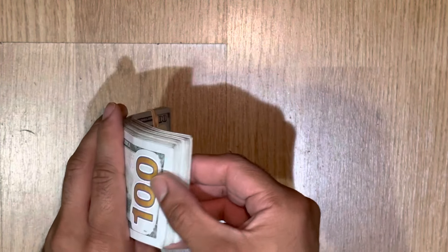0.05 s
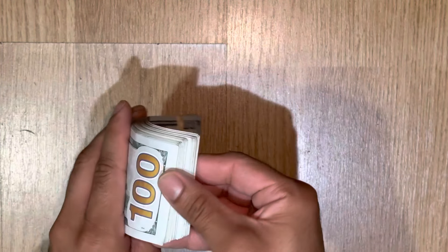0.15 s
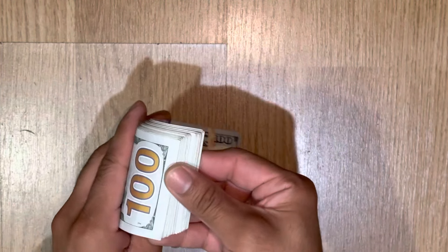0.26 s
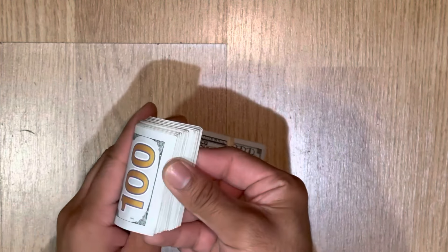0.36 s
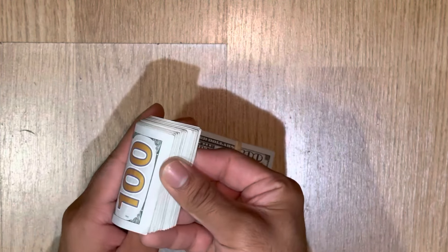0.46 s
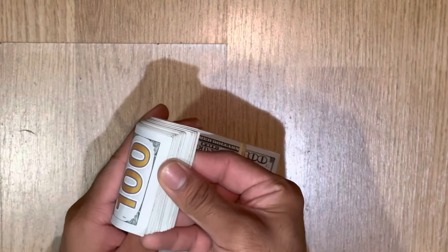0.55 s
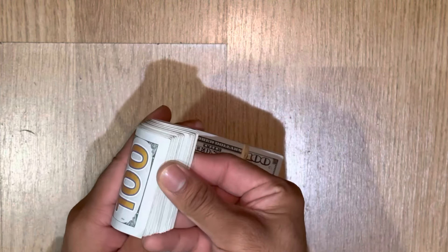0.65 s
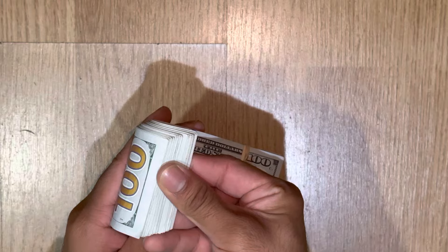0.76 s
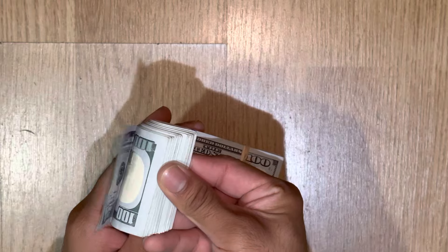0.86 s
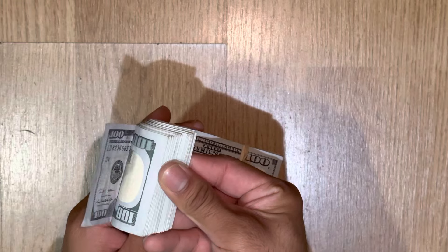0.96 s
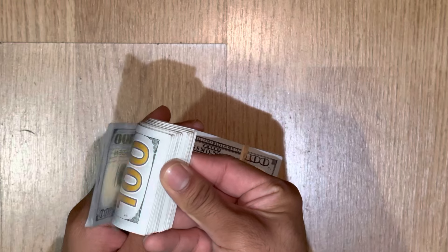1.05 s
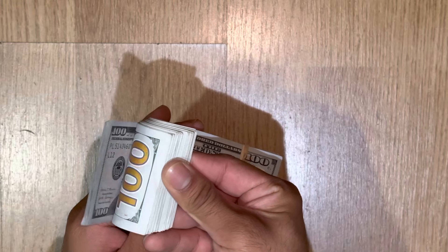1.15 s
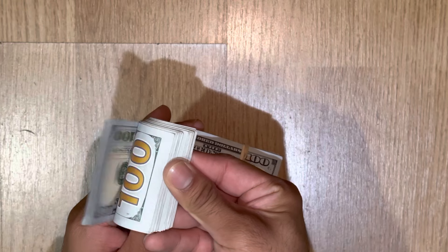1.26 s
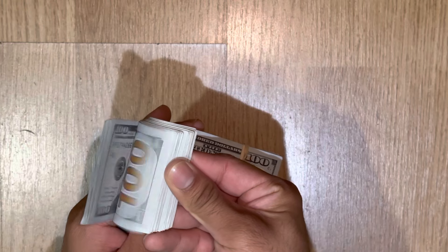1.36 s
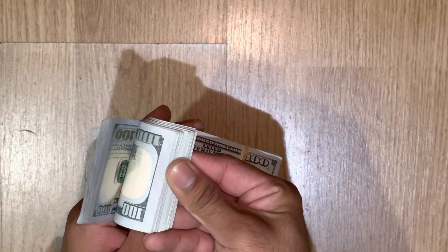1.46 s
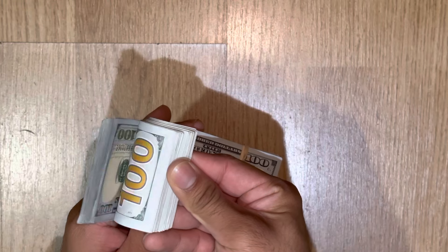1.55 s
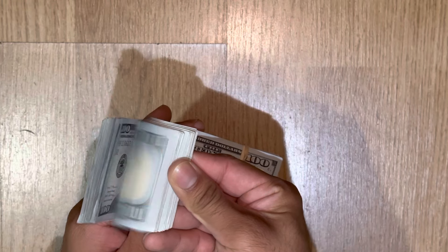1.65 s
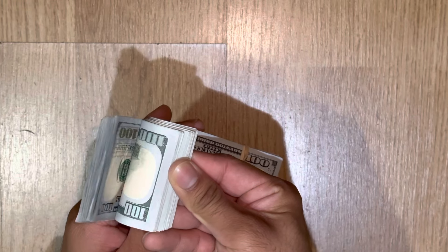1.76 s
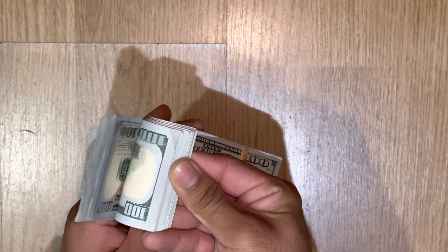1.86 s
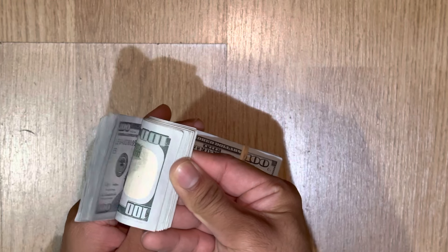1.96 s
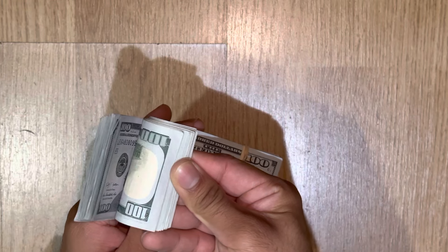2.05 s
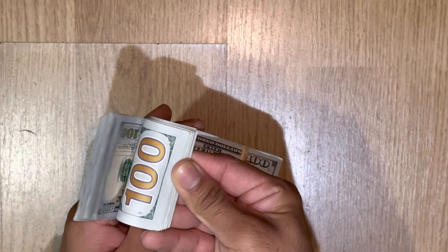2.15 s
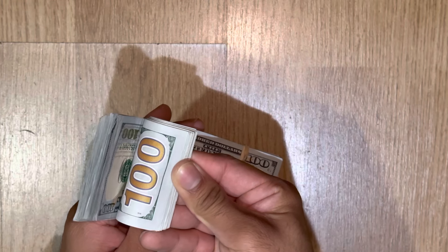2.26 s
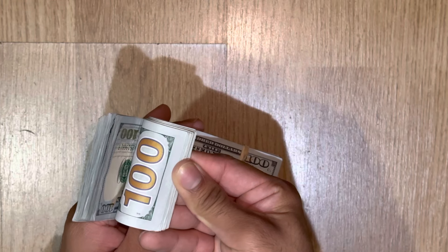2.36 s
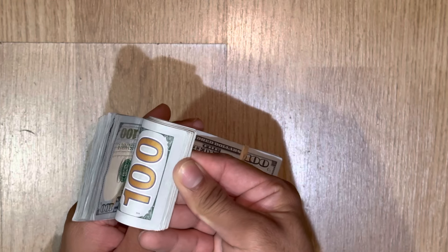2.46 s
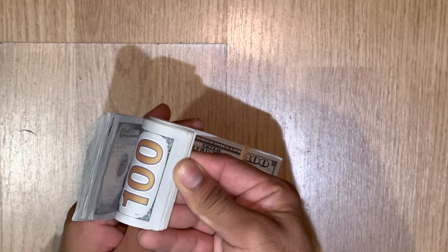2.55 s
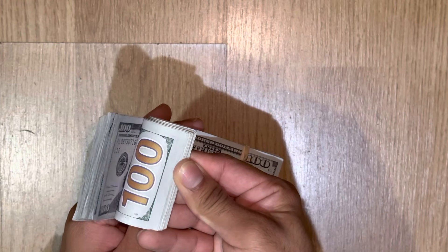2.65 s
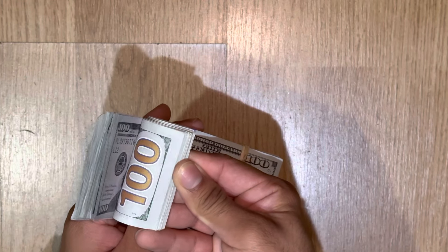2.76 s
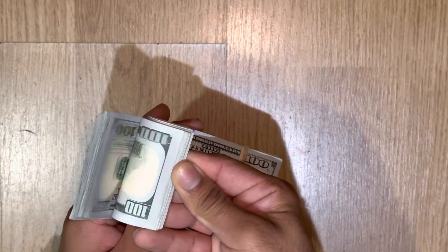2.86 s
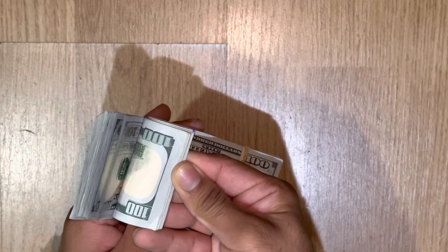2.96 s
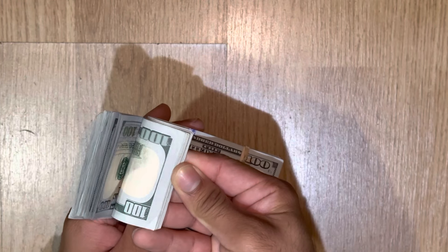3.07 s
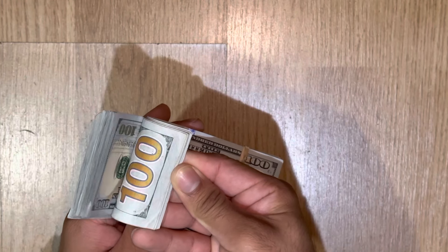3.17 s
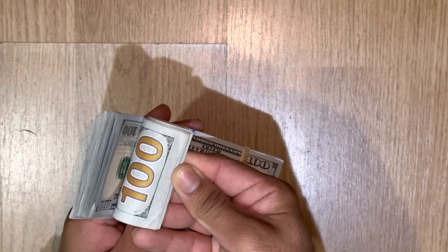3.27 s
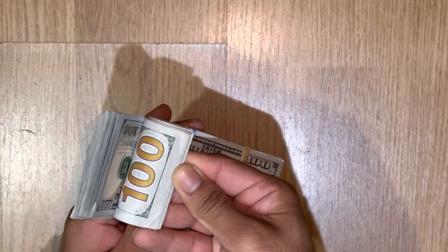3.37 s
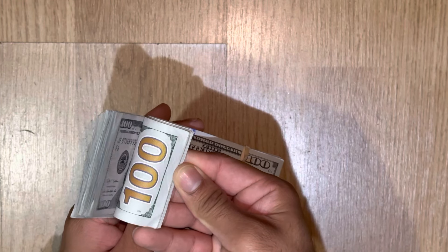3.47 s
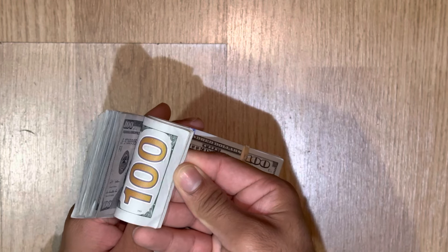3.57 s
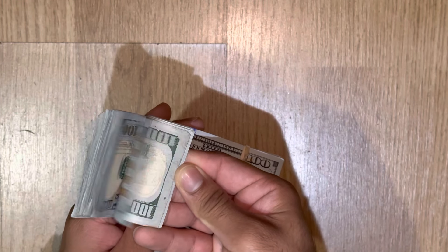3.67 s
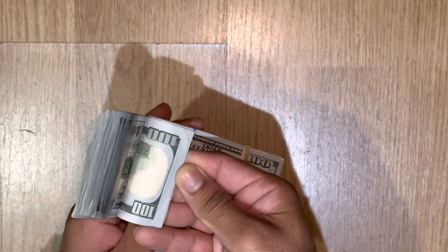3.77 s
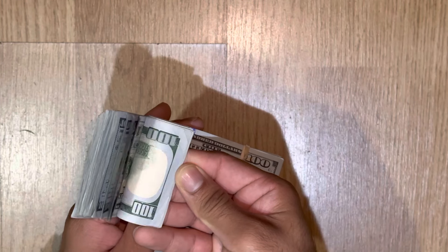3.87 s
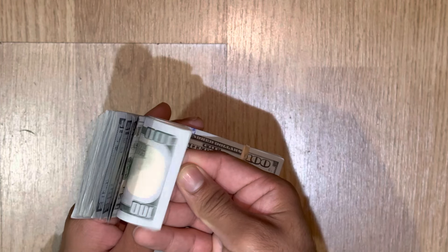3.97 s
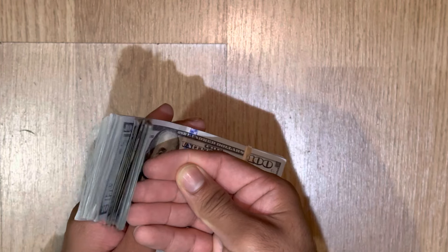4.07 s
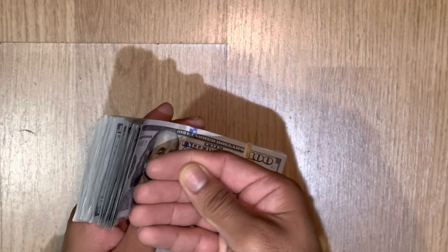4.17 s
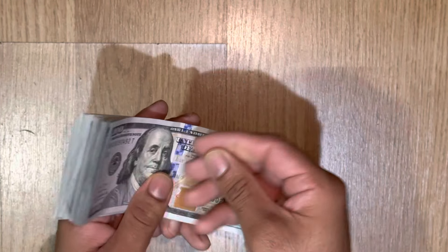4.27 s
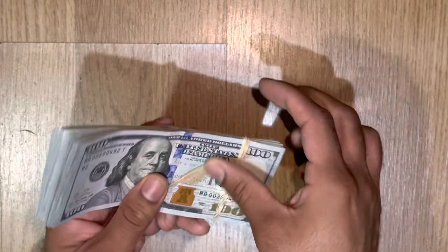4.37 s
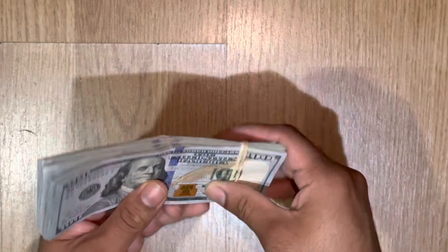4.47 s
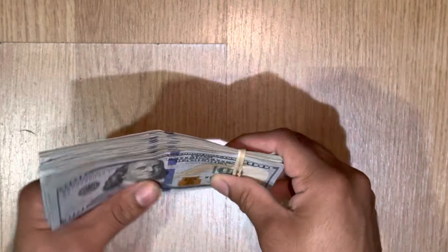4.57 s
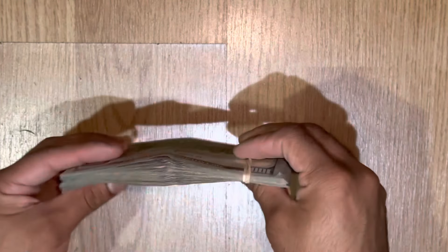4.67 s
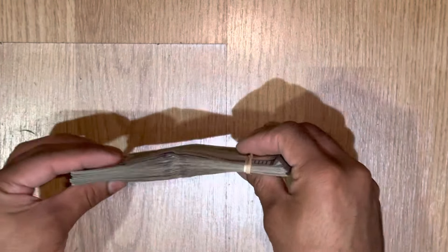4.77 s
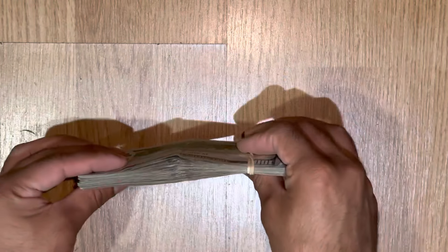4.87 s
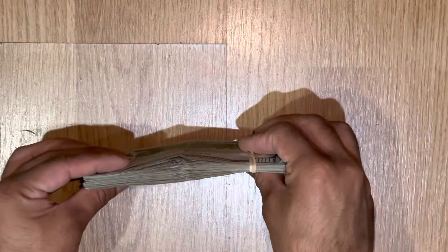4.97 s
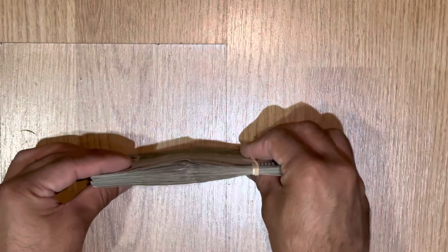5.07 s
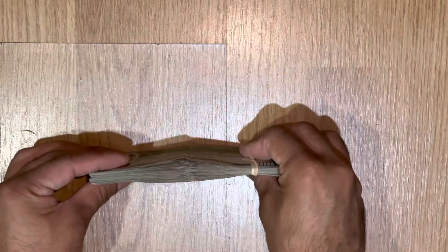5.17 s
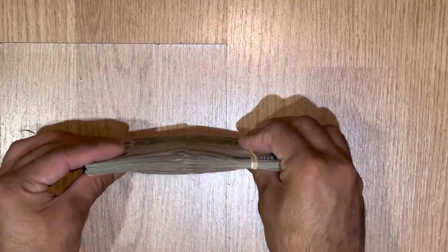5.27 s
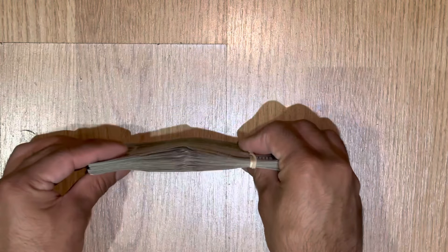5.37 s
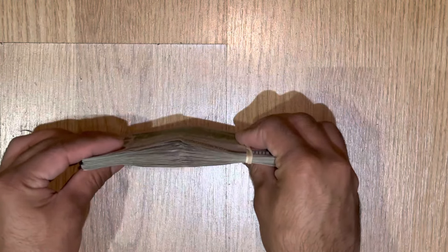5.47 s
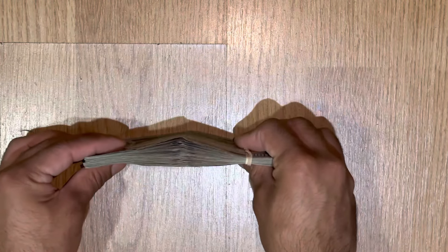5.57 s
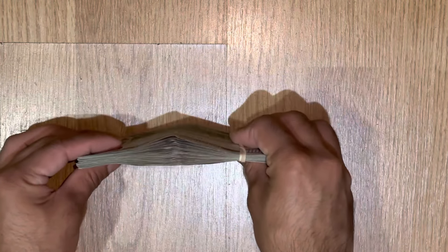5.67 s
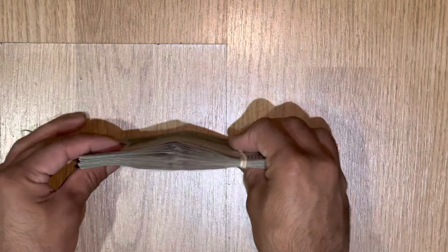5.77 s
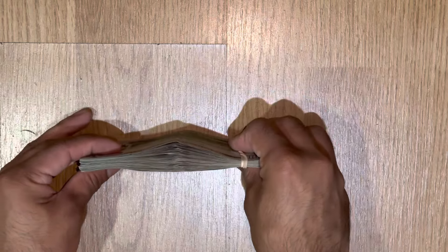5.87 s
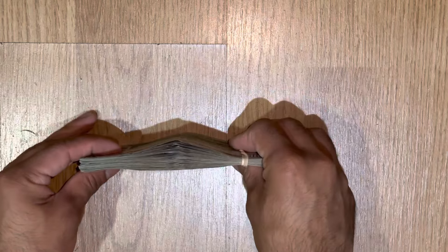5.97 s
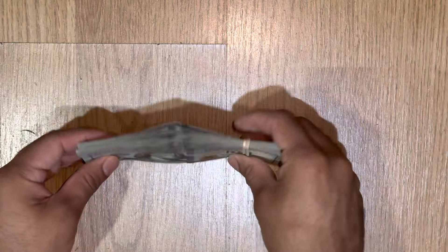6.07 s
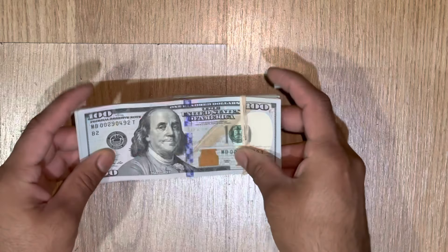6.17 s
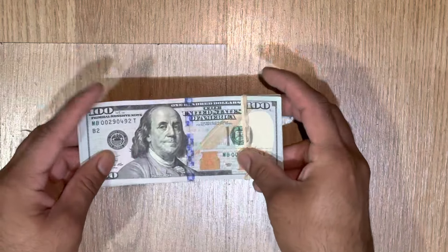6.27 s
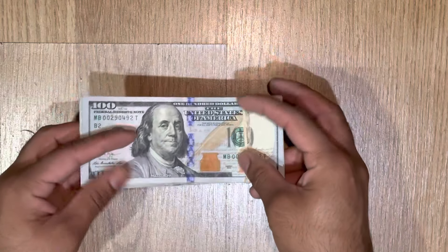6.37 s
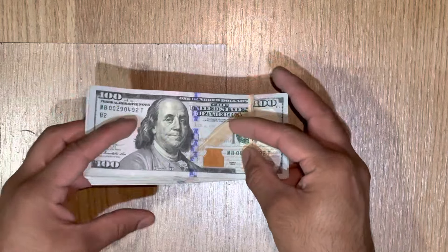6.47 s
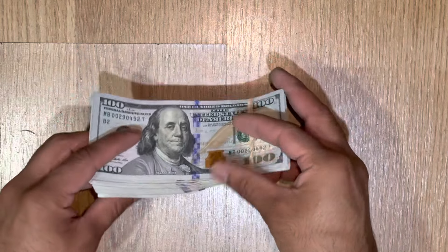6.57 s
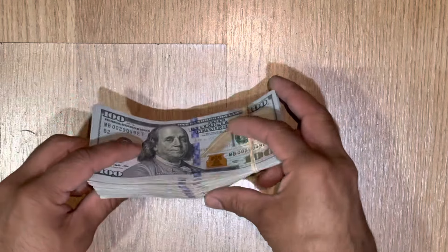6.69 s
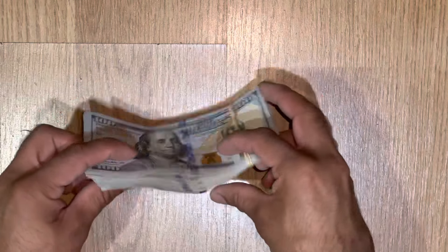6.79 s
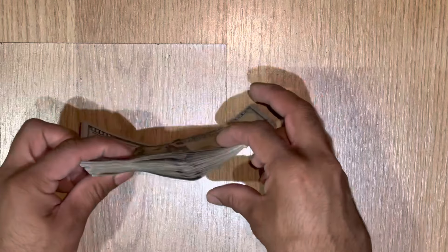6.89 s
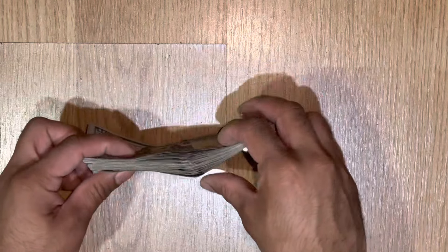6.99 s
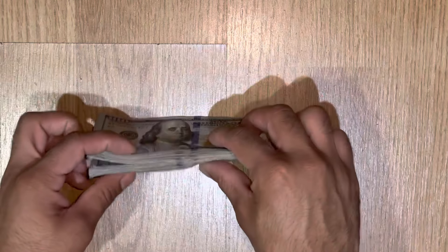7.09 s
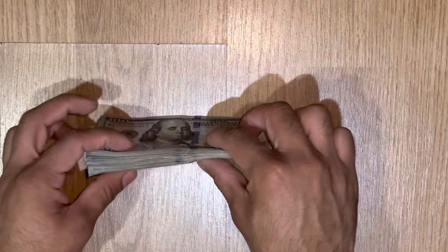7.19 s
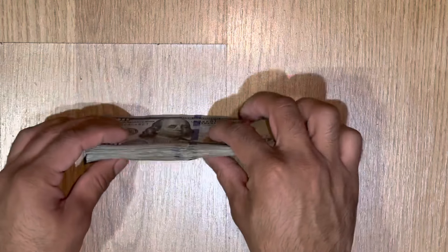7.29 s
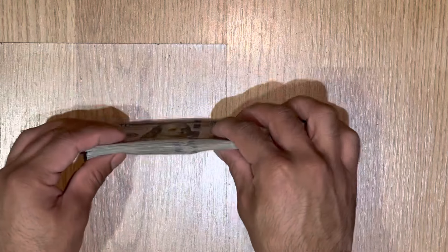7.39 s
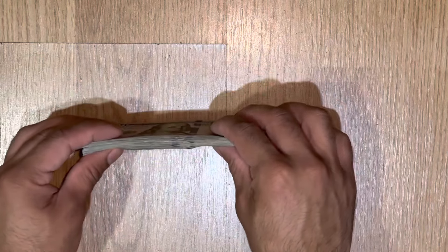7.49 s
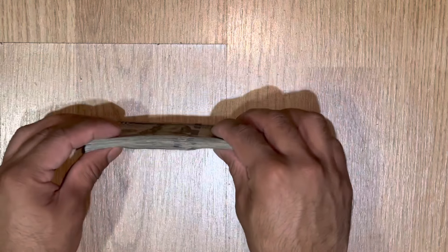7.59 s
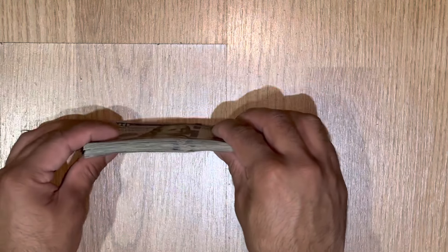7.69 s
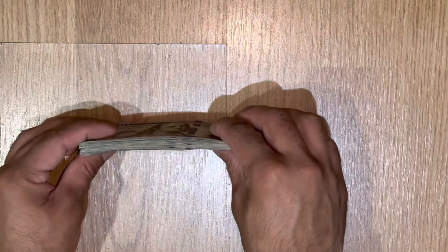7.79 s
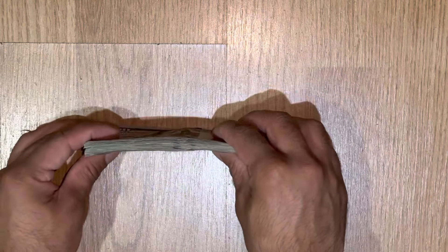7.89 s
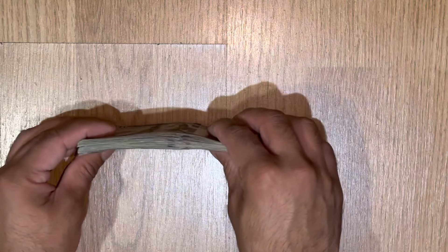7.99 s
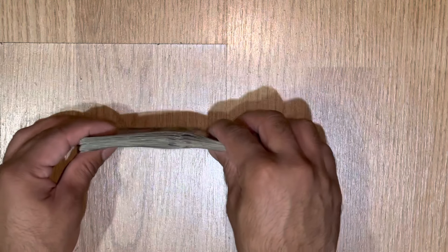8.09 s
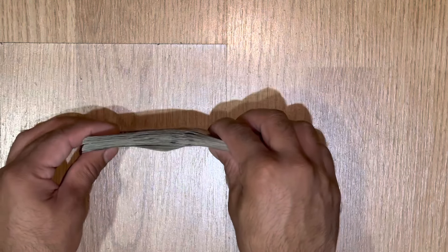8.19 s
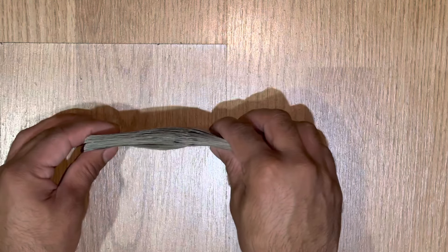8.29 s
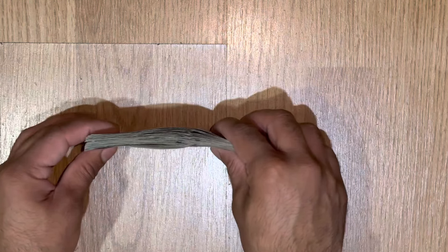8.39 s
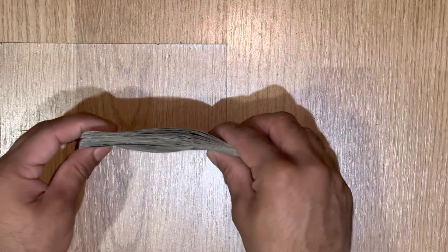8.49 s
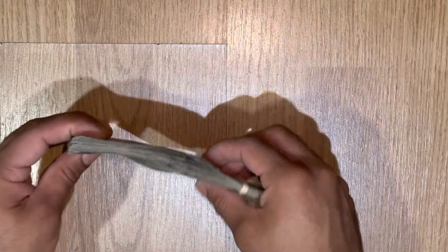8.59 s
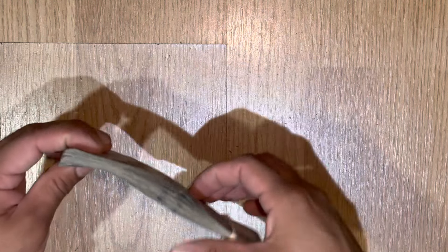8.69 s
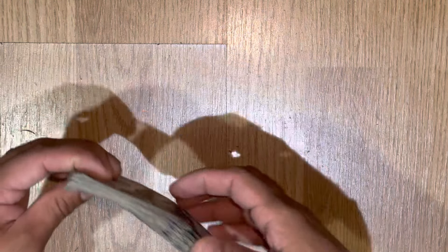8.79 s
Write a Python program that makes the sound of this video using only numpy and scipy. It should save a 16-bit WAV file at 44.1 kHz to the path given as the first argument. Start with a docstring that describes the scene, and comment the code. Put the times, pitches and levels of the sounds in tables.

```python
"""A note scrapes and snaps first: a banded stack of crisp banknotes is thumbed just under a phone.
The place is a small quiet room; each freed note is a burst of fibre noise with a short ring, then a pat.
Grainy noise slides the notes together; the stack's edge knocks a wooden surface four times, then three,
as noise bursts over decaying wood modes. Behind lie soft air, low rumble and a distant appliance's hum.
Two spaced microphone ports hear it, with the blows a little to the right."""
import sys
import numpy as np
from scipy import signal
from scipy.fft import rfft, irfft
from scipy.io import wavfile
from scipy.ndimage import uniform_filter1d

SR = 44100
rng = np.random.default_rng(int(sys.argv[2]) if len(sys.argv) > 2 else 0)


def waveform_to_disk(signal):
    """Save audio, clipped to [-1, 1], as 16-bit WAV at the path in sys.argv[1]."""
    frames = np.transpose(np.atleast_2d(signal))
    scaled = np.clip(frames, -1, 1) * 32767
    samples = np.round(scaled).astype(np.int16)
    wavfile.write(sys.argv[1], SR, samples)


N = 389844
MS = SR / 1000  # samples per millisecond
TIME = np.arange(N) / SR
HZ = np.arange(N // 2 + 1) * SR / N  # frequencies of the full-length spectrum


def undb(db):
    """Decibels to gain."""
    return 10 ** (np.asarray(db) / 20)


def unit(x):
    """Scale to rms 1."""
    return x / np.sqrt(np.mean(x ** 2))


def packet(x, db, ms):
    """Give a short sound the energy of a level held for so many ms."""
    return x * undb(db) * np.sqrt(ms * MS / np.sum(x ** 2))


def band(x, lo_hz, hi_hz, order=2):
    """Causal band-pass."""
    edges = [lo_hz, min(hi_hz, SR / 2 - 1000)]
    return signal.sosfilt(signal.butter(order, edges, "band", fs=SR, output="sos"), x)


def resonate(x, hz, q):
    """One resonance, gain 1 at its centre."""
    return signal.lfilter(*signal.iirpeak(min(hz, SR / 2 - 1000), max(q, 1), SR), x)


def along(table, hz):
    """Read (frequency, value) points on a log-frequency axis."""
    f, value = np.transpose(table)
    return np.interp(np.log(hz + 1), np.log(f + 1), value)


def colour(x, table):
    """Shape a sound by (frequency [Hz], gain [dB]) points."""
    return irfft(rfft(x) * undb(along(table, HZ)), N)


def walk(rate, size):
    """Smooth chance, new about rate times a second, spread near 1."""
    steps = np.arange(size) * rate / SR
    count = int(steps[-1]) + 2
    return np.interp(steps, np.arange(count), rng.standard_normal(count))


def add(track, s, sound):
    """Mix a sound in, starting at s seconds."""
    start = int(round(s * SR))
    lo, hi = max(start, 0), min(start + len(sound), N)
    track[lo:hi] += sound[lo - start:hi - start]


def crack(envelope, count=3, width_hz=500):
    """Bursts of breaking contacts, their energy spread evenly over all frequencies."""
    size = 2 * len(envelope)
    spectrum = rfft(envelope * rng.standard_normal((count, len(envelope))), size)
    power = uniform_filter1d(np.abs(spectrum) ** 2, max(int(width_hz * size / SR), 3))
    return irfft(spectrum / np.sqrt(power), size)[:, :len(envelope)]


# notes snapping free, just under the phone: (time [s], level [dB], ring of the bent note [Hz],
# ring strength before the common ring_db [dB], crispness [dB re level])
NOTE_SNAPS = [(0.0713, -55.5, 3700, 7, -11), (0.8087, -53.5, 7450, 0, 0.5),
              (1.0181, -57.5, 7600, -18, 11.5), (1.0691, -49.5, 7470, 1, 2), (1.1511, -51, 6360, -1, -11),
              (1.2045, -50.5, 5100, -4, 3.5), (1.2621, -44.5, 7100, -10, -12), (1.358, -50.5, 7200, -3, -1),
              (1.3771, -55.5, 4860, -12, 3), (1.4176, -53, 5800, -15, 4), (1.442, -49, 5800, 2, -5),
              (1.4968, -46.5, 4870, 1, 2.5), (1.548, -48, 3950, 1, 1), (1.5842, -46.5, 6260, -14, -5),
              (1.6655, -53.5, 5900, -18, -4), (1.6788, -38, 5900, 8, 2.5), (1.819, -46, 6560, -3, 6),
              (1.8343, -43, 6950, 3, 0), (1.8923, -47.5, 6650, -1, 3.5), (1.958, -42, 4700, -23, -4),
              (2.129, -42, 5920, -1.5, -2.5), (2.5608, -48, 3850, -6, 1), (2.789, -50, 7140, -4, 3),
              (2.8572, -49, 6600, -3, -1), (2.8887, -45.5, 3740, -8, 2), (3.1032, -44, 6400, -12, -9),
              (3.1575, -43, 6130, 9, -2), (3.4543, -54.5, 6500, -4, 0), (3.647, -51, 4800, -1, -10),
              (3.6581, -41, 7440, -14, -5), (3.6785, -44.5, 3850, -2, -7), (3.7524, -35.5, 5200, -11, -15),
              (4.011, -41.5, 6070, -8, -2), (4.4997, -52, 7700, -3, -21), (6.195, -60.5, 7900, -4, 1),
              (8.675, -66.5, 5000, 2, -10)]
# a harder flick is shorter and has less body: values at FLICK_DB and their change per dB above it
FLICK_DB, SNAP_MS, SNAP_SHORTENS_DB_PER_DB = -49, 1, 0.33
FLICK_BODY_DB, FLICK_BODY_DB_PER_DB = -8, -0.49  # body re level
# the note catches on the thumb just before it slips: chance picks the lead and 0 to 2 times this strength
CATCH_MIN_MS, CATCH_MAX_MS, CATCH_DB = 5.2, 9.5, -22.5


def flicks(scrape_db=-20, scrape_ms=5, ring_db=-3.0, ring_q=25, overtone=1.627, overtone_db=-2,
           top_sharpness=1.46):
    """Each note scrapes over the thumb, catches, and snaps free, ringing briefly."""
    out = np.zeros(N)
    ms = np.arange(-30 * MS, 15 * MS) / MS  # the snap is at 0
    chances = rng.random((len(NOTE_SNAPS), 2))
    for (s, db, hz, ring, crisp), (catch_chance, lead_chance) in zip(NOTE_SNAPS, chances):
        force = db - FLICK_DB
        length = SNAP_MS * undb(-SNAP_SHORTENS_DB_PER_DB * force)
        scrape = undb(scrape_db) * np.exp(-np.abs(ms) / scrape_ms) * (ms < 0)
        catch_lead = np.interp(lead_chance, [0, 1], [CATCH_MIN_MS, CATCH_MAX_MS])
        catch = undb(CATCH_DB) * 2 * catch_chance * np.exp(-np.abs(ms + catch_lead) / length)
        slip = np.exp(-np.abs(ms) / length) + catch + scrape
        fibres = crack(slip, count=2)
        low = band(fibres[0], 1300, 4780)
        mid = unit(band(fibres[1], 3600, 9600, order=3))
        # only the fastest slip reaches the top
        fastest = crack(slip ** top_sharpness, count=1)[0]
        top = unit(band(fastest, 8050, 14900, order=3))
        strength = undb(ring + ring_db)  # the curl of the note sets how clearly it rings
        mid = mid + strength * unit(resonate(mid, hz, ring_q))
        top = top + strength * undb(overtone_db) * unit(resonate(top, hz * overtone, ring_q))
        body = FLICK_BODY_DB + FLICK_BODY_DB_PER_DB * force
        sound = packet(low, body, 5) + packet(mid, 0, 5) + packet(top, crisp, 5)
        add(out, s + ms[0] / 1000, undb(db) * sound)
    return out


# delay after the snap, decay, level at FLICK_DB and its change per dB above it
FLAP_S, FLAP_DECAY_S, FLAP_DB, FLAP_DB_PER_DB = 0.00593, 0.014, -75, .2


def flaps(lo_hz=260, hi_hz=850):
    """Each freed note pats the fanned pile with a faint, dull puff of decaying noise."""
    out, t = np.zeros(N), TIME[:SR // 8]
    for s, db, *_ in NOTE_SNAPS:
        puff = band(rng.standard_normal(len(t)) * np.exp(-t / FLAP_DECAY_S), lo_hz, hi_hz)
        add(out, s + FLAP_S, packet(puff, FLAP_DB + FLAP_DB_PER_DB * (db - FLICK_DB), 18.3))
    return out


# paper sliding on paper and skin: (time of the peak [s], rise [s], fall [s],
# level before the common slide_db [dB], crispness [dB re level])
PAPER_SLIDES = [(0.06, 0.019, 0.021, -63.5, -6), (0.812, 0.0093, 0.046, -64.5, -6),
                (3.632, 0.006, 0.01, -49, 2), (3.998, 0.0075, 0.018, -48, 1.5),
                (4.343, 0.01, 0.019, -52.5, 3), (4.43, 0.13, 0.21, -63, -21), (4.69, 0.094, 0.028, -53, 9),
                (6.2, 0.068, 0.032, -62.5, -3), (6.43, 0.05, 0.044, -75.5, 3),
                (6.578, 0.0087, 0.044, -61, -8), (6.825, 0.059, 0.042, -53.5, -3),
                (7.05, 0.02, .07, -63, -2), (7.124, 0.02, 0.019, -45.5, -10.5),
                (7.295, 0.041, 0.12, -68, -14), (7.395, 0.025, .018, -59.5, -6),
                (8.67, 0.24, 0.6, -78.5, -3)]
# a gentle slide is duller: body re level at SLIDE_DB and its change per dB above it
SLIDE_DB, SLIDE_BODY_DB, SLIDE_BODY_DB_PER_DB = -59.5, -1.5, -0.2054
# after a knock the loose notes slip down; the crisper the edges, the louder
SETTLE_S, SETTLE_RISE_S, SETTLE_FALL_S = 0.077, 0.039, 0.042
SETTLE_DB, SETTLE_DB_PER_DB, SETTLE_CRISP_DB = -56, 0.3, -8.5  # level before slide_db


def slides(grain_db=3, grain_rate=800, catch_db=2.5, catch_rate=130, slide_db=-2, crackle_db=13):
    """Fibres catch and slip: a grainy hiss swells and dies with each movement, with crackles of creases."""
    t = TIME[::40]  # the slow swells need few points
    settles = [(s + SETTLE_S, SETTLE_RISE_S, SETTLE_FALL_S,
                SETTLE_DB + SETTLE_DB_PER_DB * crisp, SETTLE_CRISP_DB) for s, *_, crisp in STACK_KNOCKS]
    body, hiss, crisp = np.zeros((3, len(t)))
    for s, rise, fall, db, crisp_db in list(PAPER_SLIDES) + settles:
        distance = np.maximum((s - t) / rise, (t - s) / fall)
        power = undb(db) ** 2 * np.exp(-2 * distance.clip(max=20))
        body_db = SLIDE_BODY_DB + SLIDE_BODY_DB_PER_DB * (db - SLIDE_DB)
        body = body + power * undb(body_db) ** 2
        hiss = hiss + power
        crisp = crisp + power * undb(crisp_db) ** 2
    body, hiss, crisp = (np.interp(TIME, t, power) for power in (body, hiss, crisp))
    creases = (rng.random(N) < 70 / SR) * rng.random(N) ** 2  # about 70 a second
    crackle = signal.lfilter([1], [1, -np.exp(-1 / (0.66 * MS))], creases)  # each dies in 0.66 ms
    grip = undb(grain_db * walk(grain_rate, N) + catch_db * walk(catch_rate, N))
    fibres = (grip + undb(crackle_db) * crackle) * rng.standard_normal((3, N))
    return undb(slide_db) * (np.sqrt(body) * unit(band(fibres[0], 740, 3700))
                             + np.sqrt(hiss) * unit(band(fibres[1], 3500, 8800, order=3))
                             + np.sqrt(crisp) * unit(band(fibres[2], 6900, 15400, order=2)))


# the stack knocked on the wood, stray edges first and then its bulk; levels are those of the bulk:
# (time of the stray edges [s], lag of the bulk [ms], extra gain of the stray edges [dB], thud [dB],
# slap [dB], slap pitch [Hz], edge hiss [dB], crispness [dB re hiss])
STACK_KNOCKS = [(5.098, 15, 3, -42.5, -49, 710, -53.5, -47), (5.343, 17, -0.5, -44, -40.5, 1110, -46, -14),
                (5.561, 13.8, 2.5, -39, -40, 960, -38.5, -35), (5.76, 8.9, -1.5, -29, -34, 572, -44.5, -8),
                (7.6189, 6, 1, -35, -40.5, 574, -42, -1), (7.867, 11, 1.5, -36.5, -42.5, 680, -44, 3),
                (8.119, 8.3, -5.5, -30, -35, 680, -40.5, -3)]
# the stray edges land briefly, higher in pitch, with little weight: a pitch ratio, and dB re the bulk
EDGE_MS, EDGE_PITCH, EDGE_THUD_DB, EDGE_HISS_DB, EDGE_CRISP_DB = 7.8, 1.07, -8.5, -4, -0.5
BULK_MS = 13.7  # how long the bulk takes to land
# a harder knock reaches higher modes: their limit at THUD_DB and its rise per dB above it
FIRM_HZ, THUD_DB, FIRM_DB_PER_DB = 594, -38.5, 0.33


def knocks():
    """Each knock lands twice: the notes that stick out touch first, then the whole stack."""
    out = np.zeros(N)
    for s, lag, edge, thud, slap, hz, hiss, crisp in STACK_KNOCKS:
        firm_hz = FIRM_HZ * undb(FIRM_DB_PER_DB * (thud - THUD_DB))
        first = landing(EDGE_MS, thud + EDGE_THUD_DB, firm_hz, slap, hz * EDGE_PITCH,
                        hiss + EDGE_HISS_DB, crisp + EDGE_CRISP_DB)
        add(out, s, undb(edge) * first)
        add(out, s + lag / 1000, landing(BULK_MS, thud, firm_hz, slap, hz, hiss, crisp))
    return out


# modes that ring in each landing: (frequency [Hz], level before scatter and firmness [dB], t60 [s])
WOOD_MODES = [(133.2, -10.5, 0.44), (164.7, -3, 0.22), (198.6, 4, 0.17), (231, 3, 0.059), (258, -12, 0.11),
              (309, -13.5, 0.18), (372, -5.5, 0.11), (430, 4.5, 0.042), (518.5, 5, 0.11), (570, 4.5, 0.1),
              (610, 7, 0.032), (712, 4.5, 0.022), (836, -9, 0.02), (977, -2.5, .15), (1120, -16, 0.18)]
THUD_LAG_MS = 2.48  # the weight arrives just after the slap


def landing(length, thud, firm_hz, slap, slap_hz, hiss, crisp, slap_q=2.28, grain_db=3, scatter_db=1,
            thump_db=-4, thump_ms=14):
    """Many edges land within a few ms: they hiss, the paper slaps, and the wood thuds."""
    t = TIME[:SR // 2]
    mode_hz, mode_db, t60 = np.transpose(WOOD_MODES)
    decay = np.exp(-np.log(1000) * np.outer(1 / t60, t))
    rings = np.sin(2 * np.pi * np.outer(mode_hz, t)) * decay
    # every spot of the wood favours other modes; the soft paper reaches only the low ones
    scatter = scatter_db * rng.standard_normal(len(WOOD_MODES))
    spot = rng.choice([-1, 1], len(WOOD_MODES)) * undb(mode_db + scatter)
    wood = spot / np.sqrt(1 + (mode_hz / firm_hz) ** 4) @ rings
    contact = (1 - np.exp(-t * 10000 / length)) * np.exp(-t * 1000 / length)
    edges = crack(contact * undb(grain_db * walk(1200, len(t))))
    # the hands and the bulk of the paper add a dull, toneless thump
    thump = band(rng.standard_normal(len(t)) * np.exp(-t * 1000 / thump_ms), 148, 326)
    stack = band(resonate(edges[0], slap_hz, slap_q), 123, 3.2 * slap_hz)
    held = 5 + length / 2  # ms
    weight = packet(wood, thud, 14.8) + packet(thump, thud + thump_db, 22.6)
    weight = np.interp(t - THUD_LAG_MS / 1000, t, weight, left=0)
    edge_hiss = packet(band(edges[1], 890, 6200), hiss, held)
    edge_crisp = packet(band(edges[2], 5700, 14500, order=3), hiss + crisp, held)
    return weight + packet(stack, slap, held) + edge_hiss + edge_crisp


# soft bumps: freed notes landing on the fanned pile, later the stack bumping against the hand:
# (time [s], slap level [dB], slap pitch [Hz])
SOFT_BUMPS = [(0.815, -75, 740), (2.127, -62.5, 1440), (2.886, -59, 1780), (4.009, -57, 1870),
              (4.289, -59, 1320), (4.3266, -49.5, 1100), (6.859, -58.5, 1100), (7.019, -63, 680),
              (7.106, -46.5, 660), (7.337, -56.5, 700), (8.307, -51, 640), (8.653, -70, 1500)]
BUMP_MS, BUMP_FIRM_HZ = 10, 706
BUMP_THUD_DB, BUMP_HISS_DB, BUMP_CRISP_DB = -6.5, -13.5, -25  # re slap, re slap, re hiss


def bumps():
    """Single soft landings, of notes on the pile and later of the stack against the hand."""
    out = np.zeros(N)
    for s, db, hz in SOFT_BUMPS:
        add(out, s, landing(BUMP_MS, db + BUMP_THUD_DB, BUMP_FIRM_HZ, db, hz,
                            db + BUMP_HISS_DB, BUMP_CRISP_DB))
    return out


# a harder slap pushes more air aside and booms more: level at SLAP_DB and its change per dB above it
SLAP_DB, BOOM_DB, BOOM_DB_PER_DB = -39, -43, 0.26
BUMP_BOOM_DB = -17.5  # a bump booms less than a knock of the same strength


def booms(hz=65.15, swell_s=0.038, upper_hz=81, upper_db=-9):
    """A close pair of low room resonances swells after each knock or bump and dies away."""
    out, t = np.zeros(N), TIME[:SR]
    swell = (t / swell_s * np.exp(1 - t / swell_s)) ** 0.78
    boom = swell * (np.sin(2 * np.pi * hz * t) + undb(upper_db) * np.sin(2 * np.pi * upper_hz * t))
    pushes = [(s + lag / 1000, slap, 0) for s, lag, _, _, slap, *_ in STACK_KNOCKS]
    pushes += [(s, db, BUMP_BOOM_DB) for s, db, _ in SOFT_BUMPS]
    for s, slap, softer_db in pushes:
        level = BOOM_DB + softer_db + BOOM_DB_PER_DB * (slap - SLAP_DB)
        add(out, s, np.sqrt(2) * undb(level) * boom)
    return out


# how long the small room's tail lasts: (frequency [Hz], t60 [s])
TAIL_T60 = [(100, 0.63), (500, 0.4), (2000, 0.58), (6000, 0.45), (10000, 0.29), (16000, 0.25)]


def room(x, early_db, late_db, early_t60=0.2):
    """Quick reflections off the wood and hands, then the tail of the walls, all as decaying noise."""
    t = TIME[:SR * 2 // 3]
    edges = np.geomspace(90, 20000, 12)  # each band of the tail dies at its own pace
    hz = np.arange(len(t) // 2 + 1) * SR / len(t)
    spectrum = rfft(rng.standard_normal(len(t)))
    late = np.zeros(len(t))
    for lo, hi in zip(edges, edges[1:]):
        decay = np.exp(-np.log(1000) * t / along(TAIL_T60, np.sqrt(lo * hi)))
        late = late + irfft(spectrum * (hz >= lo) * (hz < hi), len(t)) * decay
    late = late * (1 - np.exp(-t / 0.0006))
    early = rng.standard_normal(len(t)) * np.exp(-np.log(1000) * t / early_t60) * (t > .001)
    early = undb(early_db) * early / np.linalg.norm(early)
    late = undb(late_db) * late / np.linalg.norm(late)
    return signal.fftconvolve(x, early + late)[:N]


# low rumble, rising while the hands move: (time [s], level of its narrow core before flutter [dB])
RUMBLE_LEVEL = [(0, -64), (.4, -70.5), (.75, -63.5), (2.1, -61), (2.3, -72), (2.6, -69.5), (4.2, -66),
                (4.8, -68), (5.3, -58), (6.5, -66.5), (7, -56), (7.5, -65.5), (8.3, -59), (8.84, -65.5)]


def rumble(flutter_db=2, spread_db=-9):
    """Deep, uneven rumble: a narrow band of low noise over a fainter, wider one."""
    deep = unit(band(rng.standard_normal(N), 41.0, 65.9))
    deep = deep + undb(spread_db) * unit(band(rng.standard_normal(N), 40, 104, order=3))
    return deep * undb(np.interp(TIME, *np.transpose(RUMBLE_LEVEL)) + flutter_db * walk(11, N))


# colour of the room's still air: (frequency [Hz], relative level [dB per Hz])
AIR_COLOUR = [(65, -30), (110, -1.5), (160, -10), (260, -9.5), (422, -11.5), (487, -15), (594, -18.5),
              (850, -21), (1170, -25.5), (1330, -21), (2200, -15.5), (2320, -20.5), (3440, -28),
              (4430, -31.5), (8000, -36.5), (10400, -96), (17600, -120)]
AIR_DB = -71.5  # about which the air wavers


def air(hiss_db=-95):
    """Soft, slightly restless noise of the room over the microphone's own hiss."""
    restless = .8 * walk(3.4, N)  # dB
    still = unit(colour(rng.standard_normal(N), AIR_COLOUR)) * undb(AIR_DB + restless)
    return still + undb(hiss_db) * unit(band(rng.standard_normal(N), 10000, 12500, order=2))


# a distant appliance's tones: (frequency [Hz], level before wavering [dB rms])
HUM_TONES = [(242.2, -87.5), (479.1, -79.5), (1712, -101), (1766, -91.5), (2164, -85)]


def hum(waver_db=3.0, drift=0.55):
    """Faint machine tones that waver in level and phase (drift in radians)."""
    out = np.zeros(N)
    for hz, db in HUM_TONES:
        level = np.sqrt(2) * undb(db + waver_db * walk(9, N))
        out = out + level * np.sin(2 * np.pi * hz * TIME + drift * walk(7, N))
    return out


# colour of the air that differs between left and right: (frequency [Hz], gain [dB])
AIR_SIDE_GAIN = [(60, -15), (110, -7.5), (200, -10), (380, -7), (700, -1), (1290, -2.5), (2380, -45),
                 (4400, -13), (8120, -37), (15000, 10)]
# colour of the echo that differs between left and right: (frequency [Hz], gain [dB])
ROOM_SIDE_GAIN = [(100, 2), (300, 5.5), (1200, 11.5), (2200, -0.5), (4500, 1.5), (12000, -13.5)]


def scene(lean_db=-23, background_lean_db=-24, rumble_side_db=-22):
    """Notes are counted in the middle and knocked a little to the right; the room spreads them slightly."""
    paper = flicks() + flaps() + slides()
    blows = knocks() + bumps()
    background = booms() + rumble() + air() + hum()
    paper_room = room(paper, early_db=-5.5, late_db=-10.5)
    blow_room = room(blows, early_db=-7.0, late_db=-8.5, early_t60=0.069)
    mid = paper + blows + paper_room + blow_room + background
    side_room = room(paper, early_db=-20.5, late_db=-36) + room(blows, early_db=-24.5, late_db=-23)
    echoes = colour(side_room, ROOM_SIDE_GAIN)
    spread = echoes + colour(air(), AIR_SIDE_GAIN) + undb(rumble_side_db) * rumble()
    side = spread - undb(lean_db) * blows - undb(background_lean_db) * background
    return np.array([mid + side, mid - side])


# the two microphone ports fall out of step in the treble: (frequency [Hz], lead of the left [rad])
PORT_LEAD = [(0, 0), (7700, 0), (8400, -3), (9300, -3.1), (10200, -1.4), (15700, 6.2)]
TOP_HZ = 16200


def record(dry):
    """The spaced ports shift the treble of one side against the other; the top is cut."""
    lead = np.interp(HZ, *np.transpose(PORT_LEAD))
    right = irfft(rfft(dry[1]) * np.exp(-1j * lead), N)
    ports = np.array([dry[0], right])
    return signal.sosfilt(signal.ellip(8, .2, 70, TOP_HZ, fs=SR, output="sos"), ports)


dry = scene()
out = record(dry)
waveform_to_disk(out)
```